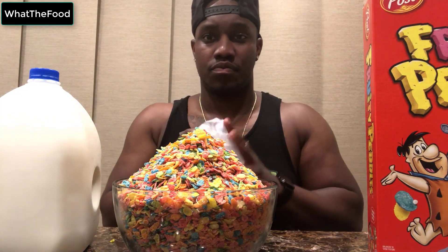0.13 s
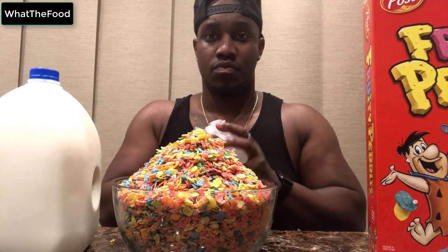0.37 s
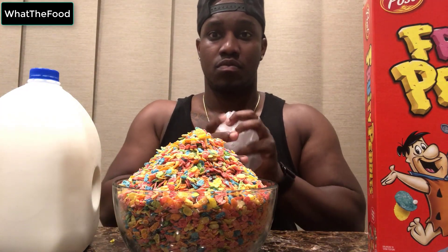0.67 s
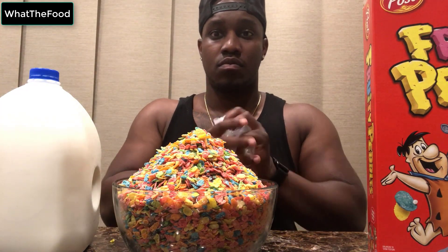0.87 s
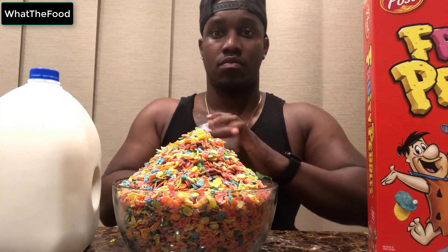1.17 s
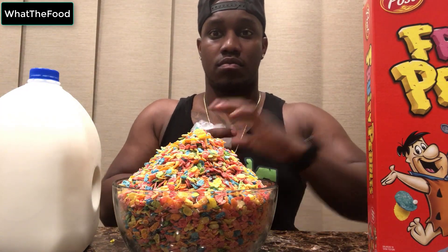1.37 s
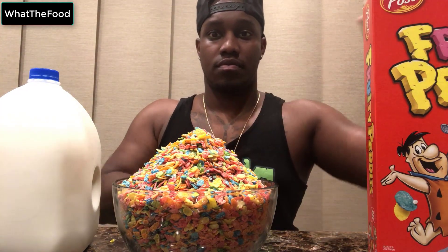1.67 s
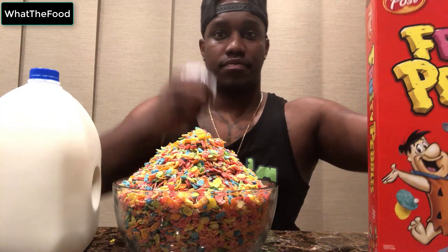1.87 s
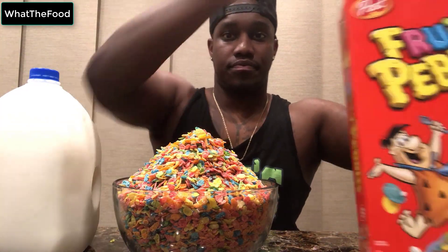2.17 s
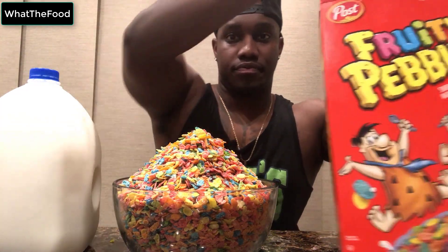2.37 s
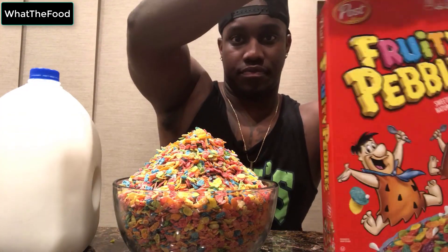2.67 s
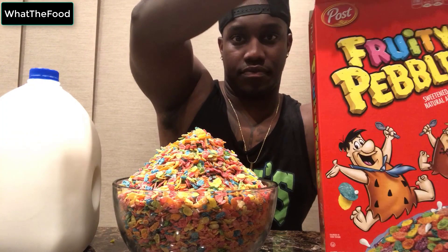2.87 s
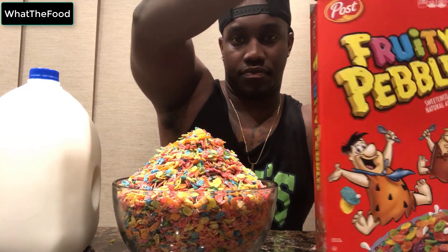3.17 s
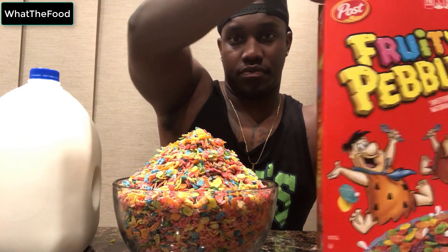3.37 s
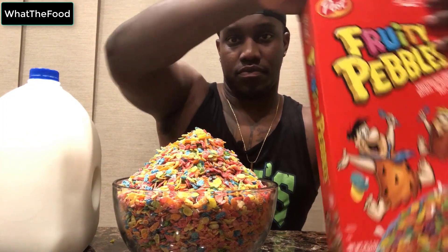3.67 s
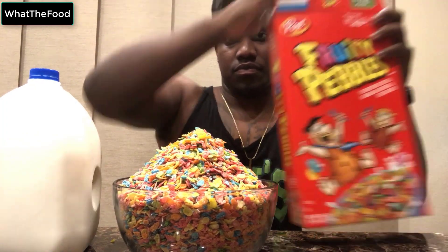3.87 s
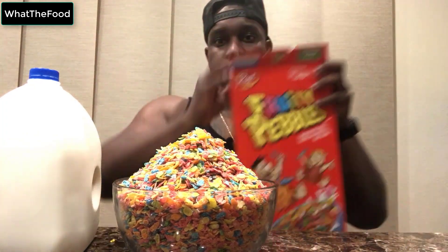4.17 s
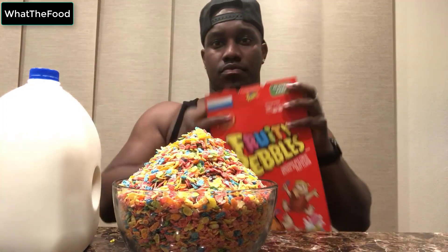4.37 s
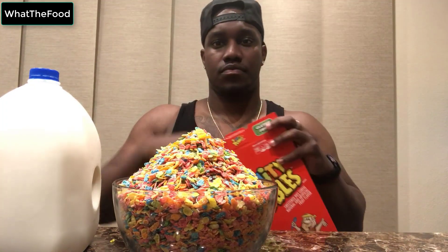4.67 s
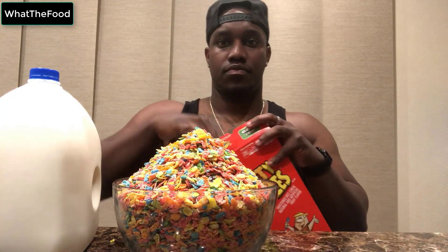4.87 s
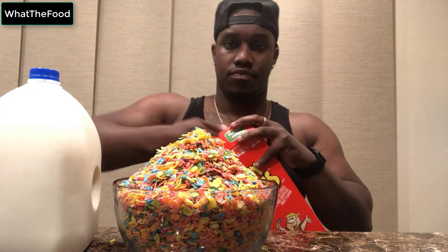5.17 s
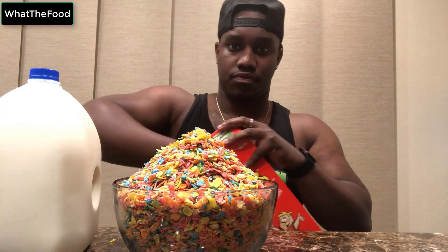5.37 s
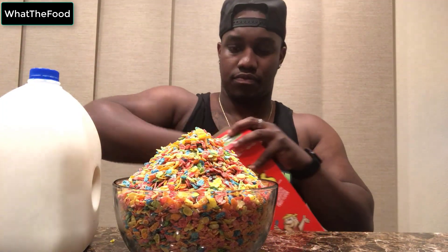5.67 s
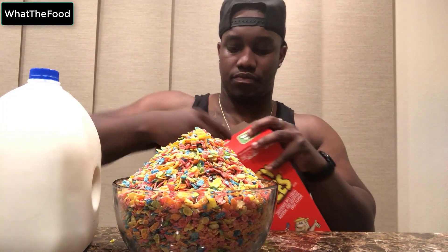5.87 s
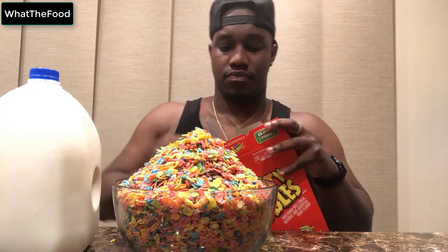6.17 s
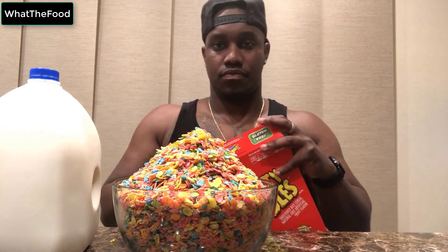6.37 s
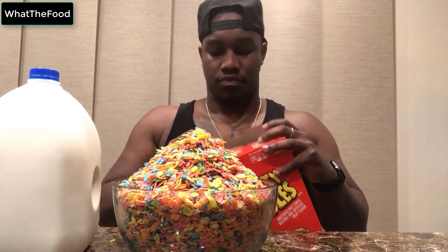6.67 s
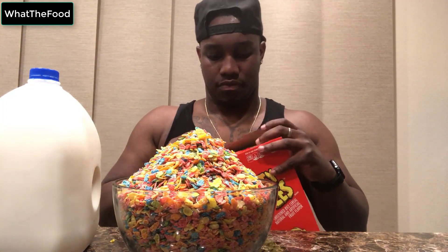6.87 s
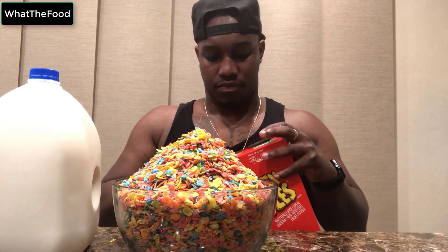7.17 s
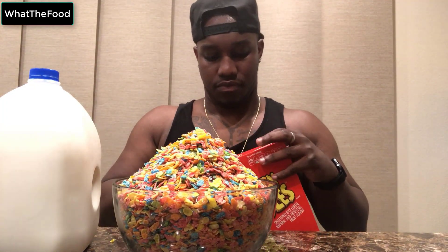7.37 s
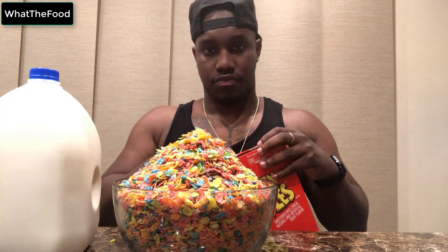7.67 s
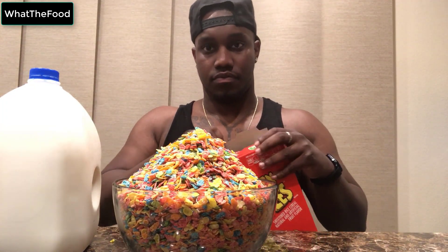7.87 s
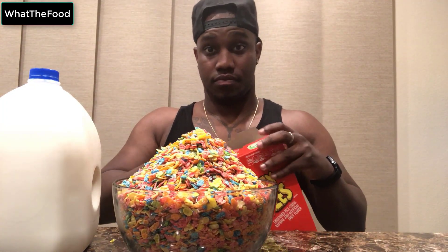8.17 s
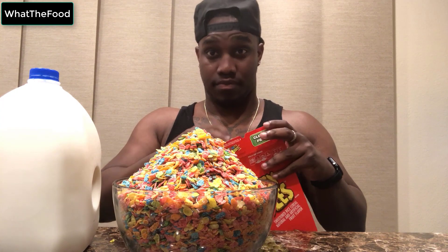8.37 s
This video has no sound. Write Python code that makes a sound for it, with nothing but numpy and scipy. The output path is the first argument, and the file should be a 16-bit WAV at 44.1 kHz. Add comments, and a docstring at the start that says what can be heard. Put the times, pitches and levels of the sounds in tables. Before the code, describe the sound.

Hands crumple a stiff paper wrapper, with dense crackle and hard snaps thinning to a few ticks. A cardboard box hisses and crunches across crumbs on a counter, then is handled with low booming thumps, hollow knocks, brief rustles of dry cereal and bright flap snaps. A thumb rasps under the flap; sparse taps and thuds finish. Close, dry phone sound, small room, low puffs of stirred air.

```python
"""A stone counter in a small room, heard close by from a phone: a paper wrapper is crumpled and let go,
then a cereal carton is dragged over grit, knocked and opened. Random clicks, coloured by their material,
make paper, grit and rubbed card; noise bursts and damped modes make snaps, taps and thumps.
Flakes rush as the carton is handled; later a jerky rasp frees the top flap.
Low noise is the stirred air; a short tail is the room."""
import sys
import numpy as np
from scipy import signal
from scipy.fft import rfft, irfft, next_fast_len
from scipy.io import wavfile
from scipy.ndimage import uniform_filter1d, map_coordinates

SR = 44100
rng = np.random.default_rng(int(sys.argv[2]) if len(sys.argv) > 2 else 0)


def to_wav(s):
    """Save 16-bit WAV."""
    ch = np.atleast_2d(s).T  # columns
    pcm = np.round(np.clip(ch, -1, 1) * 32767)  # PCM
    wavfile.write(sys.argv[1], SR, pcm.astype(np.int16))


N = 376173
HIT = np.arange(SR // 4) / SR  # time within one blow, s


def amp(db):
    """Decibels to gain."""
    return 10 ** (np.asarray(db) / 20)


def unit(x):
    """Scaled to rms 1."""
    return x / np.sqrt(np.mean(x ** 2) + 1e-20)


def crest(x):
    """Scaled to peak 1."""
    return x / np.abs(x).max()


def along(points, hz):
    """(Hz, value) points read on a log frequency axis."""
    f, v = np.transpose(points)
    return np.interp(np.log(hz + 1), np.log(f), v)


def curves(rows):
    """One value per sample for each column after the time."""
    s, *cols = np.transpose(rows)
    return [np.interp(np.arange(N) / SR, s, c) for c in cols]


def during(rows):
    """1 for as long as a curve lasts, with soft ends."""
    t = np.arange(N) / SR
    inside = (t >= rows[0][0]) & (t <= rows[-1][0])
    return uniform_filter1d(1. * inside, SR // 100)


def stroke(start, length, rise, sag, release):
    """The envelope of one movement: it swells, sags while it lasts and dies away, each in dB a second."""
    t = np.arange(N) / SR - start
    return amp(rise * np.clip(t, -1, 0) - sag * np.clip(t, 0, length) - release * np.clip(t - length, 0, 1))


def wobble(rate):
    """A smooth random curve, rate knots a second."""
    knots = rng.standard_normal(int(N * rate / SR) + 4)
    return map_coordinates(knots, [np.arange(N) * rate / SR])


def add(track, s, sound):
    """Mix a sound in at time s."""
    part = track[max(round(s * SR), 0):][:len(sound)]
    part += sound[:len(part)]


def colour(x, spectrum):
    """Causal minimum-phase filter with the gains of a spectrum."""
    m = 2 * next_fast_len(len(x) // 2 + 4096)
    gains = amp(along(spectrum, np.fft.rfftfreq(m, 1 / SR)))
    cepstrum = irfft(np.log(gains + 1e-6))
    # Folding the cepstrum forward in time makes the filter causal.
    cepstrum[1:m // 2] *= 2
    cepstrum[m // 2 + 1:] = 0
    return irfft(rfft(x, m) * np.exp(rfft(cepstrum)), m)[:len(x)]


def split(x, hz):
    """The parts below and above hz."""
    halves = [signal.butter(2, hz, kind, fs=SR, output="sos") for kind in ("low", "high")]
    return [signal.sosfilt(np.vstack([sos, sos]), x) for sos in halves]


def burst(t60, rise=0.000075):
    """A puff of noise with a fast onset and a 60 dB decay in t60 seconds."""
    return rng.standard_normal(len(HIT)) * amp(-60 * HIT / t60) * (1 - np.exp(-HIT / rise)) ** 2


def ring(modes):
    """Damped modes, struck at new strengths and slightly new pitches each time."""
    total = 0
    for hz, db, t60 in modes:
        strength = rng.choice([-1, 1]) * amp(db + rng.normal(0, 2.0) - 60 * HIT / t60)
        pitch = hz * np.exp(rng.normal(0, 0.023))
        total = total + strength * np.sin(2 * np.pi * pitch * HIT)
    return total


def facet(t60, uneven_db, size=512):
    """The click of one small facet: a sharp snap with resonances of its own."""
    hz = np.fft.rfftfreq(size, 1 / SR)
    ripple = map_coordinates(rng.standard_normal(len(hz)), [np.sqrt(hz / 70)])
    click = np.roll(burst(t60, rise=0.00022)[:size], size // 16)
    return unit(irfft(rfft(click) * amp(uneven_db * ripple)))


def crackle(rate, spread_db, t60, uneven_db, count=256):
    """Random tiny clicks of uneven size and colour; rate is clicks a second, steady or changing."""
    bank = np.array([facet(t60, uneven_db) for _ in range(count)])
    rate = rate * np.ones(N)
    at = np.flatnonzero(rng.random(N) < rate / SR)
    # Denser clicks are smaller, so density does not set the loudness.
    size = amp(spread_db * np.minimum(rng.standard_normal(len(at)), 1.8)) / np.sqrt(rate[at])
    clicks = size[:, None] * bank[rng.integers(count, size=len(at))]
    places = at[:, None] + np.arange(bank.shape[1])
    return unit(np.bincount(places.ravel(), clicks.ravel(), N)[:N])


def shifting(x, depth_db, size=512):
    """Random resonances that drift through the sound."""
    hz, t, z = signal.stft(x, SR, nperseg=size)
    band, moment = np.meshgrid(np.sqrt(hz / 5), 22 * t, indexing="ij")
    field = map_coordinates(rng.standard_normal((len(hz), len(t))), [band, moment], order=1)
    return unit(signal.istft(z * amp(depth_db * field), SR, nperseg=size)[1][:N])


def played(grains, spectrum, level, body, cross_hz, body_db, edge_db, sheen, usual_body_db):
    """Grains coloured by material, at a changing level and body; body under usual_body_db adds sheen."""
    low, high = split(colour(grains, spectrum), cross_hz)
    middle, top = split(unit(high), 3500)
    edge = middle + top * amp(sheen * np.clip(usual_body_db - body, -10, 10))
    return amp(level) * (amp(edge_db) * edge + amp(body + body_db) * unit(low))


# Air stirred by hands and carton. Each row: time in seconds, level in dB.
DRAUGHT = [(0.2, -26.5), (0.5, -36), (1.1, -87), (2.3, -44.5), (3.05, -35), (4.04, -32), (4.14, -16),
           (5.4, -29), (5.65, -18), (5.98, -46), (6.4, -30), (7.45, -48.5), (7.75, -20), (8.53, -38)]
# Colour of the moving air. Each row: frequency in Hz, relative level in dB.
AIR = [(7, 10), (22, -2.5), (50, -12), (160, -24.5), (400, -34), (1500, -110)]
# Colour of the room's hush. Each row: frequency in Hz, relative level in dB.
ROOM_TONE = [(30, 17.5), (100, -15), (800, -14), (1300, -29.5), (4000, -28.5), (16000, -52)]
GUST_DB, GUST_WIDTH_S = -4, 0.023  # gust level relative to its thump, and width


def air():
    """Slow swells of air on the microphone, a brief gust after each thump, and the room's steady hush."""
    level, = curves(DRAUGHT)
    t = np.arange(N) / SR
    gusts = 0
    for s, db, _ in THUMPS:
        gusts = gusts + amp(db + GUST_DB) * np.exp(-((t - s - GUST_WIDTH_S) / GUST_WIDTH_S) ** 2)
    lumps = unit(colour(rng.standard_normal(N), AIR) * amp(1.9 * wobble(5.8)))
    hush = amp(-58.5) * unit(colour(rng.standard_normal(N), ROOM_TONE))
    return (amp(level) + gusts) * lumps + hush


# Squeezes of the hands on the wrapper. Each row: start in seconds, length in seconds, crackle level in dB.
SQUEEZES = [(0.016, 0.57, -22.5), (0.615, 0.33, -25), (0.966, 0.475, -21.5)]
# Creases that buckle loudly. Each row: time in seconds, level in dB before a 4 dB cut.
CREASES = [(0.03, -3.5), (0.061, 1.5), (0.194, -0.5), (0.211, -6.5), (0.2268, 2.5), (0.2428, 0),
           (0.294, 2.5), (0.459, 1.5), (0.6586, -7), (0.8057, -12.5), (0.9798, 7.5), (1.0986, -2.5),
           (1.1365, -0.5), (1.2283, 0.5), (1.246, -1.5), (1.3792, 3), (1.428, 6.5), (1.496, -2.5),
           (1.5358, -5), (1.6185, -7.5), (1.663, -12.5), (1.725, -18.5), (1.7991, -5), (1.82, -8)]
# Colour of the paper. Each row: frequency in Hz, relative level in dB.
PAPER = [(60, -29), (300, -5.5), (700, 0.5), (1550, 0), (2300, 1.5), (3900, -2.5), (7000, -3), (12300, -15),
         (15000, -16)]
SQUEEZE_RISE_DB_PER_S, SQUEEZE_RELEASE_DB_PER_S = 153.5, 96.5
SHEET_BODY_DB, TIGHTEN_DB_PER_S = 0, 6.5  # the sheet loses its low body as the ball gets tighter
GRIP_DB, THINNING = -24.5, 1.8  # under this pressure the ball lies loose and loses body, dB per dB


def wrapper():
    """Fine creases buckle densely, then more sparsely as the hands let go; some snap hard."""
    squeezes = [amp(db) * stroke(s, length, SQUEEZE_RISE_DB_PER_S, 0, SQUEEZE_RELEASE_DB_PER_S)
                for s, length, db in SQUEEZES]
    pressure_db = 20 * np.log10(np.max(squeezes, axis=0))
    looseness_db = np.clip(GRIP_DB - pressure_db, 0, 8)
    body = SHEET_BODY_DB - TIGHTEN_DB_PER_S * np.arange(N) / SR - THINNING * looseness_db
    buckling = 1250 * amp(.75 * (np.maximum(pressure_db, -50) + 22))  # clicks a second
    folds = crackle(rate=buckling, spread_db=7.2, t60=.004, uneven_db=5) * amp(1.4 * wobble(70))
    brushing = crackle(rate=6000, spread_db=2.5, t60=0.005, uneven_db=7)
    grains = shifting(folds + amp(-9) * brushing, depth_db=2.5)
    out = played(grains, PAPER, pressure_db, body, cross_hz=1260,
                 body_db=-5.0, edge_db=1.5, sheen=0.41, usual_body_db=-9.5)
    for s, db in CREASES:
        depth_db = body[round(s * SR)] + 7
        life = 0.012 * amp(0.23 * depth_db)  # a wide facet is deeper and rings longer
        low, high = split(colour(burst(life, rise=0.00013), PAPER), 1800)
        add(out, s, amp(db - 4.0) * crest(high + amp(depth_db) * low))
    return out


ARM_S, ARM_DB, ARM_HZ, ARM_T60 = 0.486, -21, 52, 0.032  # time, peak level, nominal pitch, decay in s


def arm():
    """A forearm nudges the counter: one dull, soft bump from a damped low mode."""
    out = np.zeros(N)
    add(out, ARM_S, amp(ARM_DB) * crest(ring([(ARM_HZ, 0, ARM_T60)])))
    return out


# Carton dragged over the gritty counter. Each row: time in seconds, grit level in dB,
# panel body in dB relative to the grit; both get fixed trims below.
DRAG = [(1.79, -42.5, 2), (1.91, -45, -7.5), (2.02, -35.5, -13.5), (2.07, -42, -49), (2.37, -44.5, -21.5),
        (2.43, -34, 1), (2.55, -41, -11.5), (2.88, -35.5, -6.5), (2.92, -28.5, -3.5), (3.05, -36, 0.5),
        (3.105, -22.5, -0.5), (3.19, -45, 10.5)]
# Colour of the grit. Each row: frequency in Hz, relative level in dB.
GRIT = [(250, 3.5), (650, 11), (1400, 2.5), (5300, -4.5), (6600, -11), (9000, -8), (12000, -20),
        (15000, -22)]
# Crumbs that crack under the carton. Each row: time in seconds, peak level in dB.
CRUMBS = [(2.04, -16.5), (2.395, -20), (2.479, -20.5), (2.519, -16), (2.655, -16.5)]


def drag():
    """The bottom edge hisses and ticks over grit, denser when louder; a few crumbs crack."""
    level, body = curves(DRAG)
    ticking = 700 * amp(1.7 * (np.maximum(level, -43) + 40))  # clicks a second
    ticks = crackle(rate=ticking, spread_db=8.5, t60=.003, uneven_db=6)
    hiss = amp(-6.5) * rng.standard_normal(N)
    grains = shifting((ticks + hiss) * amp(1.5 * wobble(25)), depth_db=3)
    out = during(DRAG) * played(grains, GRIT, level, body, cross_hz=1280,
                                body_db=-1.5, edge_db=0.5, sheen=0.76, usual_body_db=-1.5)
    for s, db in CRUMBS:
        crack = split(colour(burst(.005), FLAKES), 3000)[1]
        add(out, s, amp(db) * crest(crack))
    return out


# Blows that flex the whole carton. Each row: time in seconds, peak of the flexing in dB,
# hollow knock in dB relative to it.
THUMPS = [(2.42, -19.5, 2.5), (3.077, -22, 8), (3.117, -27.5, 15.5), (4.119, -12, -6), (4.206, -9, -11),
          (4.752, -16, 1), (5.088, -11.5, -14.5), (5.725, -13.5, -12), (5.828, -6.5, -8), (6.118, -14, -5),
          (6.611, -12, -13), (7.09, -19, -17), (7.829, -11, -1), (7.963, -16, 3), (8.111, -17.5, -3.5),
          (8.313, -10.5, -1)]
# Broad panels. Each row: nominal frequency in Hz, relative level in dB, 60 dB decay in seconds.
FLEX = [(39.7, 2.5, 0.12), (95.5, 1, 0.031)]
# Air inside the carton. Each row: nominal frequency in Hz, relative level in dB, 60 dB decay in seconds.
HOLLOW = [(203, 2, 0.06), (294, -9.5, 0.054), (503, -6.5, 0.08)]


def thumps():
    """The panels swing slowly, the air inside knocks hollowly and the contents land with a short thud."""
    out = np.zeros(N)
    for s, db, knock_db in THUMPS:
        thud = crest(split(burst(0.13, rise=0.00065), 365)[0])
        knock = crest(ring(HOLLOW)) + amp(3.0) * thud
        add(out, s, amp(db) * (crest(ring(FLEX)) + amp(knock_db) * crest(knock)))
    return out


SING_SHUT_HZ, SING_OPEN_HZ = 601, 780  # the rubbed panel's ring, with the top flap shut and once it is free
SING_WANDER, SING_DB = .11, -10  # pitch wander as a share of the pitch; level before the body adjusts it


def singing(wander):
    """A narrow, fuzzy resonance of the rubbed panel; it lies higher once the flap has come free."""
    hz = np.where(np.arange(N) / SR < RASP[-1][0], SING_SHUT_HZ, SING_OPEN_HZ)
    phase = 2 * np.pi * np.cumsum(hz * np.exp(wander * wobble(12))) / SR
    return unit(wobble(90) * np.cos(phase) + wobble(90) * np.sin(phase))


# The changing rustle of the hands on the carton, under the strokes.
# Each row: time in seconds, scrape level in dB.
HOLD = [(3.14, -43), (3.8, -45.5), (4.02, -70), (4.3, -43.5), (4.76, -45), (4.88, -62.5), (5.0, -35),
        (5.48, -46), (5.85, -48), (5.95, -68), (6.17, -48.5), (6.65, -54), (6.75, -64), (7.55, -75),
        (8.15, -48.5), (8.53, -72)]
# Strokes of fingers and flaps on card. Each row: start in seconds, length in seconds, scrape level in dB,
# panel body in dB relative to the scrape; both get fixed trims below.
STROKES = [(3.299, 0.053, -41, 9.5), (3.622, 0.13, -39.5, 7), (3.877, 0.019, -46, 15.5),
           (4.132, 0.13, -41.5, 12), (4.433, 0.076, -32, 1), (4.557, 0.12, -37, 0.5),
           (4.974, 0.052, -22.5, -3), (5.542, 0.1, -42, -4), (5.717, 0.07, -35, 5), (6.282, 0.016, -29, 1),
           (6.35, 0.031, -37, -7), (6.487, 0.03, -40.5, -10), (6.59, 0.013, -25, 2),
           (6.819, 0.038, -51.5, 4.5), (6.975, .018, -48.5, -6), (7.068, 0.046, -39.5, -0.5),
           (7.16, 0.021, -43, 6.5), (7.466, 0.018, -54.5, 12.5), (7.611, 0.038, -52.5, 8),
           (7.886, 0.072, -44.5, -0.5), (8.192, 0.033, -46, -12), (8.342, 0.1, -34, 1)]
# Colour of the card. Each row: frequency in Hz, relative level in dB.
CARD = [(120, -8.5), (540, 5), (800, 4.5), (1080, -1), (1750, -2), (3000, -7.5), (7500, -15),
        (11000, -29.5)]
STROKE_RISE_DB_PER_S, STROKE_RELEASE_DB_PER_S, STROKE_SAG_DB_PER_S = 529, 519.5, 8
HOLD_PANEL_DB = 4.5  # panel body under the hands' rustle, relative to its scrape


def rub():
    """Card hisses over card in uneven strokes; the firmer the stroke, the denser its fine slips."""
    # Scrape and panel add up as powers.
    scrape = (during(HOLD) * amp(curves(HOLD)[0])) ** 2 + 1e-12
    panel = scrape * amp(HOLD_PANEL_DB) ** 2
    for start, length, db, panel_db in STROKES:
        envelope = stroke(start, length, STROKE_RISE_DB_PER_S, STROKE_SAG_DB_PER_S, STROKE_RELEASE_DB_PER_S)
        power = (amp(db) * envelope) ** 2
        scrape = scrape + power
        panel = panel + power * amp(panel_db) ** 2
    pressure_db = 10 * np.log10(scrape)
    body = 10 * np.log10(panel / scrape)
    slipping = 1100 * amp(.5 * (np.maximum(pressure_db, -70) + 38))  # clicks a second
    slips = crackle(rate=slipping, spread_db=7.2, t60=0.0044, uneven_db=5)
    hiss = amp(-.5) * rng.standard_normal(N)
    grains = shifting((slips + hiss) * amp(1.8 * wobble(70) + 1.4 * wobble(16)), depth_db=5.2)
    sung = np.sqrt(panel) * amp(SING_DB + np.clip(body - 8, -12, 3)) * singing(SING_WANDER)
    return sung + played(grains, CARD, pressure_db, body, cross_hz=1150,
                         body_db=-2.5, edge_db=1.7, sheen=0.042, usual_body_db=-14.5)


# Taps and flap snaps on the carton. Each row: time in seconds, peak level in dB,
# gain of the bright edge in dB, nominal pitch of the struck patch in Hz.
TAPS = [(3.283, -21.5, -10, 563), (4.104, -19.5, -17.5, 570), (4.167, -15, -4, 570.3),
        (4.25, -11.5, 2, 496.9), (4.324, -17, 28, 2172), (4.64, -17, 22, 905), (4.845, -23, -2, 890),
        (4.925, -12, 14, 863), (4.983, -7.5, 6, 1920), (5.003, -11.5, 13.5, 2190),
        (5.559, -17.5, 13.5, 2000), (5.827, -17.5, -6.5, 506), (6.114, -13, -5, 910), (6.385, -9, 4, 783),
        (6.425, -21, -11, 807), (6.602, -3, -2.5, 776), (7.086, -7.5, 1, 2060), (7.639, -22.5, -23, 806),
        (7.682, -32.5, -11.5, 817), (7.83, -13, -15, 490), (8.07, -21.5, -19, 1493), (8.28, -13, -3.5, 695),
        (8.349, -19, -10, 1710)]
# Stiff flaps and walls. Each row: nominal frequency in Hz, relative level in dB, 60 dB decay in seconds.
WALLS = [(416, -3, 0.055), (546, -13, 0.035), (804, -4.5, 0.095), (1400, -3, 0.031), (1758, -4.5, 0.062)]
PRESSED_T60, WALLS_DB = 0.028, -9  # decay of the struck patch in s; the walls ring more faintly


def taps():
    """Card cracks, patch and walls ring, the contents shiver; a faint noise swells briefly before each tap."""
    out = np.zeros(N)
    for s, db, edge_db, hz in TAPS:
        crack = burst(0.014, rise=.0003)
        shiver = amp(-23) * burst(0.085)
        low, high = split(crest(colour(crack + shiver, CARD)), 1700)
        around_pitch = signal.butter(1, [.8 * hz, 1.25 * hz], "band", fs=SR, output="sos")
        fuzz = signal.sosfilt(around_pitch, 6 * burst(PRESSED_T60))
        patch = crest(ring([(hz, 0, PRESSED_T60)]) + fuzz)
        body = crest(low + patch + amp(WALLS_DB) * crest(ring(WALLS)))
        add(out, s, amp(db) * crest(body + amp(edge_db) * high))
        lead_in = crest(colour(burst(.05)[::-1], CARD))
        add(out, s - HIT[-1], amp(db - 24) * lead_in)
    return out


# Flakes sliding in their bag as the carton tilts. Each row: start in seconds, length in seconds, level in dB.
SLIDES = [(3.426, 0.0042, -30.5), (3.621, 0.0032, -28.5), (4.399, 0.083, -31.5), (4.475, 0.013, -25)]
# Colour of flakes and crumbs. Each row: frequency in Hz, relative level in dB.
FLAKES = [(500, 2), (1500, 0), (7000, -2), (12300, -13.5)]


def flakes():
    """Dry flakes tumble over each other in short, bright rushes."""
    flow = sum(amp(db) * stroke(s, length, rise=4000, sag=0, release=350) for s, length, db in SLIDES)
    tumble = crackle(rate=3200, spread_db=5.5, t60=0.003, uneven_db=-1)
    return flow * unit(colour(tumble, FLAKES))


# A thumb forced along under the top flap. Each row: time in seconds, level in dB.
RASP = [(5.12, -56), (5.15, -26.5), (5.41, -23.5), (5.445, -25.5), (5.47, -35)]
# Colour of the rasp. Each row: frequency in Hz, relative level in dB.
RASP_COLOUR = [(200, -25.5), (520, -2.5), (1000, -0.5), (2500, -6.5), (15000, -33)]
RASP_SLIPS_PER_S, RASP_SCATTER = 300, 0.32  # typical slip rate, and its scatter as a natural-log ratio


def rasp():
    """The flap's edge catches and slips in quick, uneven jerks until the thumb comes free."""
    phase = np.cumsum(RASP_SLIPS_PER_S * np.exp(RASP_SCATTER * wobble(120))) / SR
    jerks = amp(-10 * (phase % 1)) * rng.standard_normal(N)  # each slip fades by 10 dB
    return during(RASP) * amp(curves(RASP)[0]) * unit(colour(shifting(jerks, depth_db=3), RASP_COLOUR))


# Decay of the small room. Each row: frequency in Hz, 60 dB decay in seconds.
ROOM = [(500, 0.28), (2000, 0.045), (12000, 0.01)]


def room(x):
    """A short noise tail, 5 ms late, in which each frequency dies at its own speed."""
    hz, t, z = signal.stft(rng.standard_normal(SR // 2), SR, nperseg=256)
    tail = signal.istft(z * amp(-60 * t / along(ROOM, hz)[:, None]), SR, nperseg=256)[1]
    return signal.oaconvolve(x, np.pad(tail / np.linalg.norm(tail), (SR // 200, 0)))[:N]


def scene():
    """Wrapper and carton, close by, with the room's faint answer, the forearm and the air."""
    paper = wrapper()
    carton = drag() + thumps() + rub() + taps() + flakes() + rasp()
    echo = room(amp(-15) * paper + amp(-21) * carton)
    return (paper + carton + echo + arm() + air())[None]


TOP_HZ = 16000  # the phone's band limit


def record(dry):
    """The phone rounds off the highest peaks and keeps nothing above its band limit."""
    rounded = dry / (1 + np.abs(dry / .62) ** 5) ** (1 / 5)
    m = next_fast_len(N + SR // 2)
    return irfft(rfft(rounded, m) * (np.fft.rfftfreq(m, 1 / SR) < TOP_HZ), m)[..., :N]


dry = scene()
out = record(dry)
to_wav(out)
```